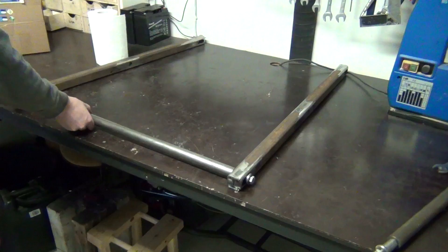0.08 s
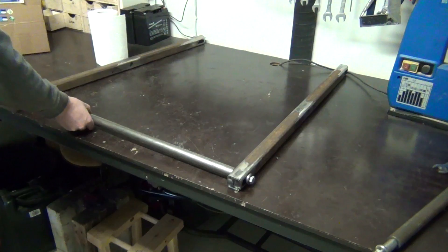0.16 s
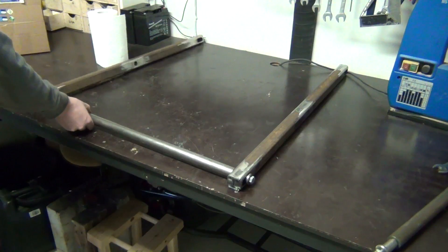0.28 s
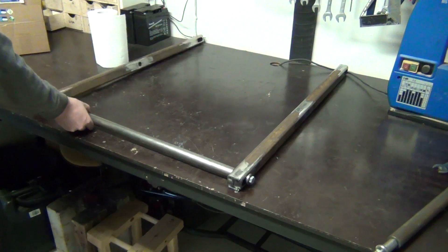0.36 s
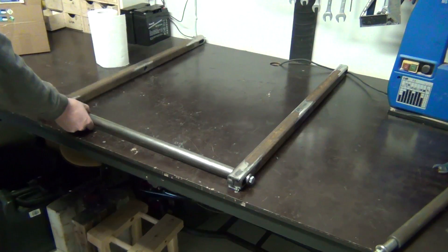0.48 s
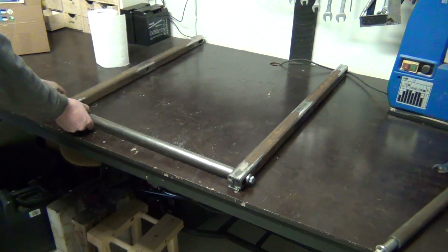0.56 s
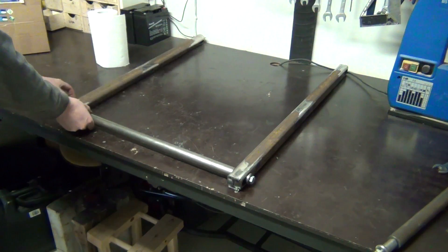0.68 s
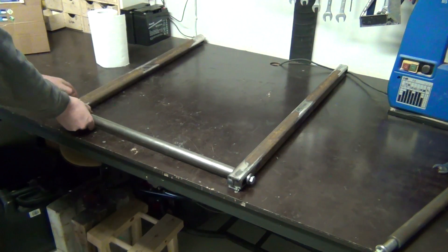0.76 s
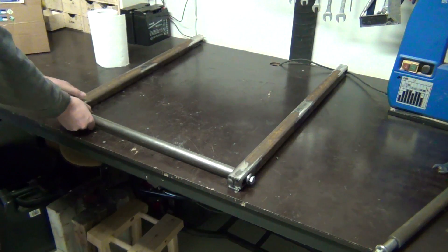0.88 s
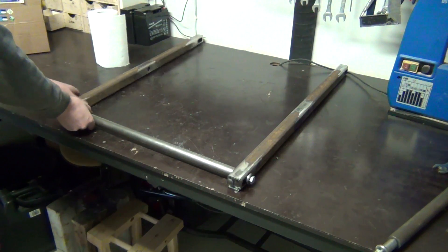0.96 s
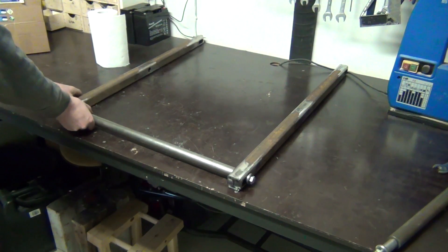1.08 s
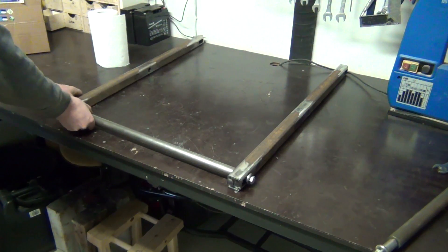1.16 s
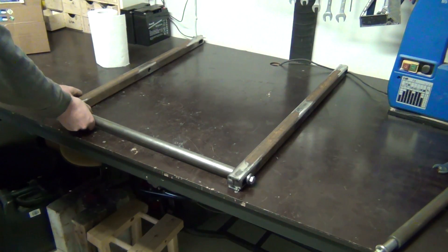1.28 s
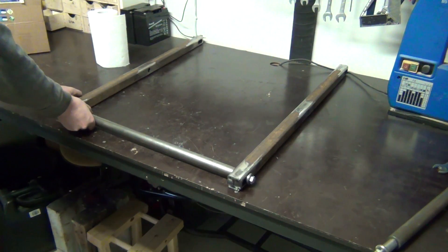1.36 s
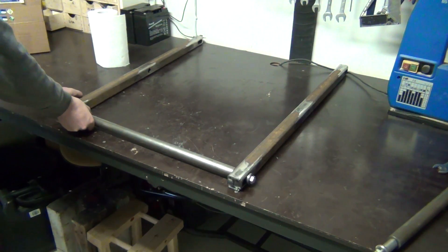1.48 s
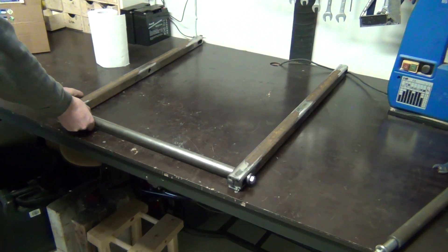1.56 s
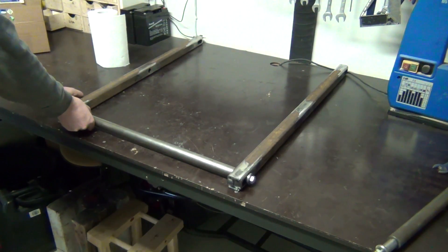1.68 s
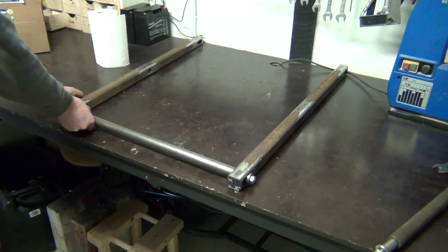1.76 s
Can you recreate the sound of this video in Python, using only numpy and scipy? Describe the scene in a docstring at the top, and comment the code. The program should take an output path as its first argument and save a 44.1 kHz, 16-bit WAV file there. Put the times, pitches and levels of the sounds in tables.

```python
"""In a workshop, a frame of steel tubes is shifted and fitted together on a heavy workbench.
The rails thud and judder on the bench top: shaped noise and decaying tones, set off by each knock.
A tube end clinks into its fitting and the steel rings: many decaying sine tones. Small clicks and light
sliding, made of shaped noise, fill the gaps. The room adds a short tail to the ringing tones,
over a faint rush of air."""
import sys
import numpy as np
from scipy import signal
from scipy.fft import rfft, irfft
from scipy.io import wavfile
from scipy.ndimage import minimum_filter1d

SR = 44100
rng = np.random.default_rng(int(sys.argv[2]) if len(sys.argv) > 2 else 0)


def transcribe(signal):
    """Save signal, clipped to [-1, 1], as a 16-bit WAV file at the path in sys.argv[1]."""
    frames = np.atleast_2d(signal).T
    limited = np.clip(frames, -1, 1)
    pcm = np.round(limited * 32767).astype(np.int16)
    wavfile.write(sys.argv[1], SR, pcm)


N = 79380
T = np.arange(N) / SR
CONTROL_T = np.arange(0, N + 16, 16) / SR  # coarser time grid for slow level curves
CUTOFF_HZ = 15800  # nothing is heard much above this


def from_db(db):
    """Turn decibels into gain."""
    return 10 ** (np.asarray(db) / 20)


def at_hz(points, hz):
    """Read a table of (pitch, value) between its points, with pitch on a log scale as we hear it."""
    point_hz, value = np.transpose(points)
    return np.interp(np.log(hz), np.log(point_hz), value)


def placed(hz):
    """Left and right gains at a pitch: each pitch leans a little to one side."""
    # stereo balance: (pitch_hz, left_minus_right_db)
    balance = [(60, -2), (130, -4), (260, -0.9), (2000, 0.1), (8000, 1.2)]
    return from_db(at_hz(balance, hz) * np.array([[0.5], [-0.5]]))


def noise_bands(colour):
    """Third-octave bands of coloured stereo noise as (pitch, band); together their rms is about 1."""
    # how alike left and right are: (pitch_hz, correlation from 0 to 1)
    likeness = [(60, 1), (250, 0.95), (1000, 0.82), (5000, 0.77), (12000, 0.84)]
    f = np.maximum(np.arange(N // 2 + 1) * SR / N, 1)
    mid, side = rfft(rng.standard_normal((2, N)))
    alike = np.clip(at_hz(likeness, f), 0, 1)
    gain = from_db(at_hz(colour, f)) * (f < CUTOFF_HZ)
    gain = gain / np.sqrt(np.mean(gain ** 2))
    # the side part enters left and right with opposite signs, which makes them differ
    stereo = np.sqrt((1 + alike) / 2) * mid + np.sqrt((1 - alike) / 2) * side * [[1], [-1]]
    stereo = stereo * placed(f) * gain
    edges = np.geomspace(20, 16000, 30)
    bands = []
    for low, high in zip(edges, edges[1:]):
        inside = (f >= low) & (f < high)
        bands.append((np.sqrt(low * high), irfft(stereo * inside, N)))
    return bands


def noise(colour):
    """Coloured stereo noise, rms about 1."""
    return sum(band for _, band in noise_bands(colour))


def envelope(start_s, attack_s, hold_s, t60_s, t=T):
    """Level of one blow: a straight rise, a hold, then a fade of 60 dB in t60_s."""
    age = np.maximum(t - start_s, 0)
    rise = np.minimum(age / attack_s, 1)
    # the hold is counted from the start of the rise
    return rise * np.exp(-np.log(1000) * np.maximum(age - hold_s, 0) / t60_s)


def smooth_level(energy):
    """Amplitude at every sample from an energy curve on the coarse time grid."""
    return np.interp(T, CONTROL_T, np.sqrt(energy))


def tone(hz):
    """A steady sine that starts at a random point of its cycle."""
    return np.sin(2 * np.pi * (hz * T + rng.random()))


def ring(modes, times, strength_db, attack_s, scatter_db):
    """Each blow feeds energy into each mode (a tone the object rings at), with a random strength."""
    out = 0
    for hz, db, t60_s in modes:
        gains = from_db(db + strength_db(hz) + scatter_db * rng.standard_normal(len(times)))
        energy = gains ** 2 @ envelope(times[:, None], attack_s, 0, t60_s, CONTROL_T) ** 2
        out = out + placed(hz) * smooth_level(energy) * tone(hz)
    return out


def contact_db(db, centre_hz, fall, hz):
    """A contact excites the modes near one pitch the most; others get less, the farther away they are."""
    return db - np.abs(fall) * np.log2(hz / centre_hz) ** 2


def flutter(seconds):
    """Random swells and dips of about the given length, from smoothed noise; spread 1."""
    bump = np.exp(-0.5 * (np.arange(-1000, 1001) / (seconds * SR / 2 + 1)) ** 2)
    slow = signal.fftconvolve(rng.standard_normal(N + 2000), bump, "valid")
    return slow / slow.std()


def workshop(x):
    """The room answers with a short diffuse tail, one part in the centre and one spread to the sides."""
    delay_s, attack_s, t60_s = 0.0035, 0.0053, 0.38
    centre_db, side_db = -8.5, -10.5
    tail = rng.standard_normal((2, N)) * envelope(delay_s, attack_s, 0, t60_s)
    tail /= np.sqrt(np.sum(tail ** 2, axis=1, keepdims=True))
    centre, side = signal.fftconvolve(x, tail, axes=1)[:, :N]
    return x + from_db(centre_db) * centre + from_db(side_db) * side * [[1], [-1]]


def air():
    """A faint, steady rush of air: noise that is strongest in the bass."""
    # tone colour of the air: (pitch_hz, relative_level_db)
    air_colour = [(25, -15), (60, 0), (200, -1.5), (400, -2.5), (800, -4.5), (1600, -8), (3500, -13),
                  (8000, -19.5), (15000, -24.5)]
    return from_db(-50) * noise(air_colour)


def faint_pitches(count):
    """Unevenly spaced pitches from 1 to 13 kHz."""
    return 1000 + 12000 * (np.arange(count) + rng.random(count)) / count


def tubes():
    """Struck tubes ring long at unrelated pitches, with many faint high tones and a short noisy wash."""
    # blows on the tubes; one before time 0 is already ringing at the start:
    # (start_s, relative_level_db, most_excited_pitch_hz, fall_off_db_per_octave_squared)
    clanks = [(-0.1, -37.5, 4400, 2.5), (0.452, -37, 6600, 28), (0.604, -19.5, 8300, 1.5),
              (0.645, -17, 970, 2), (0.686, -22.5, 3950, 1), (0.724, -26, 1760, 1.5),
              (0.947, -29.5, 6800, 7), (1.018, -33, 5400, 11), (1.326, -34.5, 786, 1.5),
              (1.402, -36.5, 4360, 0.5), (1.716, -52.5, 1010, 0)]
    # modes of the tubes, many in close pairs that beat: pitch_hz, relative_level_db and t60_s in one order
    tube_hz = [277, 746, 763, 786, 1394, 1418, 1540, 2239, 2315, 2338, 3038, 3153, 3987, 4339, 4538, 4812,
               5227, 5724, 5830, 5932, 6748, 7090, 7359, 7832, 8947, 9415, 9523, 9647, 9808, 10610, 10720,
               10970]
    tube_db = [-0.5, 10, -3, 1.5, 0, -5.5, -6, -11, -10.5, -12, -10, -3.5, -15, -21, -21, -12.5, -22.5, -7,
               -13.5, -15.5, -13.5, -23, -32, -17, -20, -14, -23, -19.5, -21.5, -24, -22, -21]
    tube_t60_s = [0.67, 0.17, 0.58, 0.17, 0.55, 0.41, 0.17, 0.61, 0.46, 0.38, 0.62, 0.32, 0.6, .6, 0.66,
                  0.27, 0.58, 0.12, 0.51, 0.34, 0.43, 0.16, 0.2, 0.32, 0.2, 0.37, 0.38, 0.43, .55, 0.53,
                  0.5, 0.25]
    # colour of the faint high tones and of the wash: (pitch_hz, relative_level_db)
    shimmer_colour = [(500, -22.5), (1400, 12.5), (2200, -8.5), (2800, -5.5), (3700, -16), (4800, -3.5),
                      (7000, -15), (9300, -9.5), (11500, -18), (15000, -35)]
    shimmer_db, shimmer_t60_s = -19, 0.41
    clatter_db, clatter_t60_s = -3, 0.24
    attack_s = 0.00069  # of shimmer and clatter
    times, db, centre_hz, fall = np.transpose(clanks)

    def strength_db(hz):
        return contact_db(db, centre_hz, fall, hz)

    def level(hz, fades):
        return np.sqrt(from_db(strength_db(hz)) ** 2 @ fades)

    modes = ring(zip(tube_hz, tube_db, tube_t60_s), times, strength_db, attack_s=0.008, scatter_db=0.47)
    long_fades = envelope(times[:, None], attack_s, 0, shimmer_t60_s) ** 2
    short_fades = envelope(times[:, None], attack_s, 0, clatter_t60_s) ** 2
    shimmer = 0
    for hz in faint_pitches(count=120):
        shimmer = shimmer + from_db(at_hz(shimmer_colour, hz)) * level(hz, long_fades) * tone(hz)
    clatter = sum(band * level(hz, short_fades) for hz, band in noise_bands(shimmer_colour))
    return workshop(modes + from_db(shimmer_db) * shimmer) + from_db(clatter_db) * clatter


def slides():
    """Steel slides on the bench: gritty friction noise that swells and fades with each push."""
    # pushes: (start_s, length_s, relative_level_db)
    pushes = [(0.07, 0.11, -44.5), (0.498, 0.14, -34), (1.199, 0.16, -42.5), (1.404, .13, -39.5)]
    # tone colour of the friction: (pitch_hz, relative_level_db)
    slide_colour = [(40, -10), (120, -1), (300, -5), (700, 3.5), (1500, -2), (2500, -11), (5000, -16.5),
                    (10000, -26), (15000, -35)]
    rough_db = 1.5  # typical size of the uneven swells
    push_level = 0
    for start_s, length_s, db in pushes:
        progress = np.clip((T - start_s) / length_s, 0, 1)
        push_level = push_level + from_db(db) * np.sqrt(np.abs(np.sin(np.pi * progress)))
    return noise(slide_colour) * push_level * from_db(rough_db * flutter(seconds=0.0029))


def ticks():
    """Brief cracks where edges meet: noise bursts over a wide range of pitch."""
    # dry contact ticks: (start_s, relative_level_db, t60_s, dull_above_hz)
    tick_table = [(0.215, -36.5, 0.21, 11400), (0.385, -34.5, 0.24, 11600), (0.447, -56, 0.05, 9000),
                  (0.6, -16, 0.025, 12000), (0.861, -18, 0.074, 15000), (0.899, -29, 0.058, 15600),
                  (1.313, -51, 0.1, 6770), (1.403, -31.5, 0.22, 6300), (1.778, -33.5, 0.15, 7400)]
    # tone colour of the ticks: (pitch_hz, relative_level_db)
    tick_colour = [(300, -27), (1500, 14.5), (3000, 3), (6000, -7.5), (11000, -5.5), (15500, -18)]
    times, db, t60_s, dull_hz = np.transpose(tick_table)
    fades = envelope(times[:, None], 0.0025, 0.0011, t60_s[:, None])  # attack and hold in seconds
    bursts = from_db(db)[:, None] * fades
    out = 0
    for hz, band in noise_bands(tick_colour):
        brightness = 1 / np.sqrt(1 + (hz / dull_hz) ** 8)
        out = out + band * (brightness @ bursts)
    return out


def bench():
    """Knocks drive strong modes and a dense ring; its bass rises slower, soft contacts lose treble."""
    # rails knock on the bench, each spot booming at its own pitch; a softer contact has a lower corner:
    # (start_s, relative_level_db, boom_pitch_hz, boom_db, softness_corner_hz, judder_s)
    knocks = [(0.222, -24.5, 140, 17, 463, 0.037), (0.390, -19, 121, 10, 1120, 0.014),
              (0.446, -10, 790, 1, 1420, 0.036), (0.469, -18.5, 70.4, 6, 990, 0.051),
              (0.56, -26, 327, -17, 2210, 0.09), (0.649, -26, 1030, 9.5, 2250, 0.035),
              (0.688, -27.5, 250, 11.5, 1850, 0.023), (0.86, -23.5, 1720, 2, 3200, 0.06),
              (0.881, -18, 65, 10, 1800, 0.031), (0.943, -12, 272, 2, 1970, 0.07),
              (1.027, -20, 275, 11, 1620, 0.048), (1.07, -18.5, 283, -21, 1460, 0.02),
              (1.323, -30.5, 756, -15, 1530, .03), (1.359, -31.5, 220, 15, 610, 0.0084),
              (1.403, -34.5, 217, 6, 1690, 0.058), (1.455, -33.5, 206, 16.5, 900, 0.066),
              (1.719, -47.5, 193, 15.5, 1900, 0.011), (1.778, -39, 1120, 10, 3470, 0.026)]
    # dense ring of bench top and frame: (pitch_hz, relative_level_db) and (pitch_hz, t60_s)
    bench_colour = [(25, -43), (42, -16), (60, -4.5), (90, -7.5), (150, -9), (300, -3), (480, -2),
                    (800, -4.5), (1100, -6), (1450, -9), (2700, -21), (6000, -25.5), (10000, -23.5),
                    (15000, -35)]
    bench_t60 = [(60, 0.49), (250, 0.5), (800, 0.43), (2000, 0.51), (6000, 0.48), (14000, .2)]
    # its strongest modes: (pitch_hz, relative_level_db, t60_s)
    bench_modes = [(61, -12, 0.31), (120.3, -8, 0.34), (184.9, -10, 0.52), (236.5, -15, 0.41),
                   (275.3, -7.5, 0.38), (316.2, -4, 0.31), (361.1, -11, 0.3), (391, -14, 0.48),
                   (474.5, -24.5, 0.27), (529, -8.5, 0.37), (570.7, -16, 0.41), (622, -22, .33),
                   (725, -13.5, 0.44), (778, -9, 0.51)]
    modes_db = -0.5
    boom_octaves, soft_slope, attack_cycles = 0.3, 1.56, 0.68
    judder_db, bump_s = 1, 0.0047  # the rail chatters unevenly: typical depth, length of one bump
    times, db, boom_hz, boom_db, corner_hz, judder_s = np.transpose(knocks)

    def strength_db(hz):
        boom = boom_db * np.exp(-0.5 * (np.log2(hz / boom_hz) / boom_octaves) ** 2)
        treble_loss = 10 * soft_slope * np.log10(1 + (hz / corner_hz) ** 2)
        return db + boom - treble_loss

    dense = 0
    for hz, band in noise_bands(bench_colour):
        attack_s = 0.00072 + attack_cycles / hz
        t60_s = at_hz(bench_t60, hz)
        # the judder holds each knock up before it fades
        fades = envelope(times[:, None], attack_s, judder_s[:, None], t60_s, CONTROL_T)
        energy = from_db(strength_db(hz)) ** 2 @ fades ** 2
        dense = dense + band * smooth_level(energy)
    modes = ring(bench_modes, times, strength_db, attack_s=0.0079, scatter_db=4.5)
    return dense * from_db(judder_db * flutter(bump_s)) + from_db(modes_db) * workshop(modes)


def fitting():
    """Short bright clinks of steel on steel: high modes that fade quickly."""
    # a tube end clinks in its fitting (the sign of the fall-off is ignored):
    # (start_s, relative_level_db, most_excited_pitch_hz, fall_off_db_per_octave_squared)
    clinks = [(0.603, -21, 5600, 9), (0.608, -25.5, 3800, -6), (0.615, -12.5, 3240, 36),
              (0.630, -15, 8700, 35), (0.945, -30, 5400, -26), (0.956, -32, 9600, 10),
              (1.314, -35, 3600, 15.5), (1.4, -26, 2850, 7.5), (1.403, -25, 5450, 23)]
    # modes of the fitting: pitch_hz, relative_level_db and t60_s in one order
    fitting_hz = [2024, 2067, 3190, 3252, 3330, 4590, 4740, 4815, 6470, 6745, 8320, 8980, 9540]
    fitting_db = [-0.5, 0.5, -3, -2, -5.5, -11.5, -4, -8, 0, -12, -34, -14, -15]
    fitting_t60_s = [0.11, 0.2, 0.031, 0.11, 0.051, 0.056, 0.11, 0.17, 0.027, 0.089, 0.13, 0.063, 0.071]
    times, db, centre_hz, fall = np.transpose(clinks)

    def strength_db(hz):
        return contact_db(db, centre_hz, fall, hz)

    modes = zip(fitting_hz, fitting_db, fitting_t60_s)
    return workshop(ring(modes, times, strength_db, attack_s=0.002, scatter_db=5.14))


def scene():
    """The frame on the bench, over the air of the room."""
    return air() + tubes() + slides() + ticks() + bench() + fitting()


def record(dry):
    """A limiter turns down the loudest blows and recovers quickly; the very top is cut."""
    limit_db, release_db_per_s, attack_s = -3, 148, 0.002
    over_db = np.maximum(20 * np.log10(np.abs(dry).max(axis=0) + 1e-9) - limit_db, 0)
    # after a peak the reduction falls back at a steady rate
    release_db = release_db_per_s * T
    held_db = np.maximum.accumulate(over_db + release_db) - release_db
    # take the largest value nearby, so that the duck begins just before the peak, then smooth it
    widened_db = -minimum_filter1d(-held_db, size=129)
    r = np.exp(-1 / (attack_s * SR))
    duck_db = signal.lfilter([1 - r], [1, -r], widened_db)
    top_cut = signal.ellip(10, 0.1, 90, CUTOFF_HZ, fs=SR, output="sos")
    return signal.sosfilt(top_cut, dry * from_db(-duck_db))


dry = scene()
out = record(dry)
transcribe(out)
```